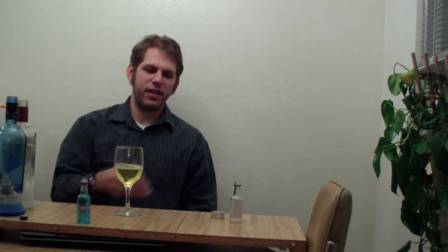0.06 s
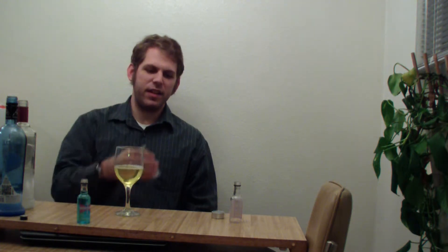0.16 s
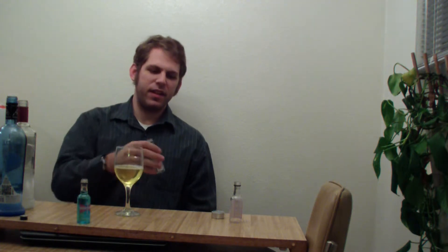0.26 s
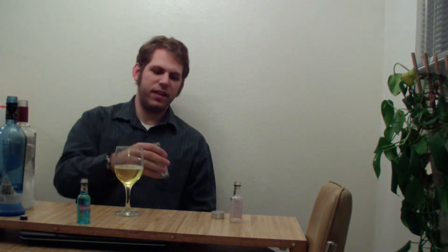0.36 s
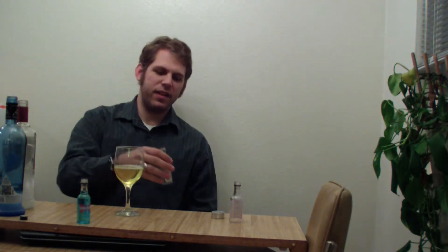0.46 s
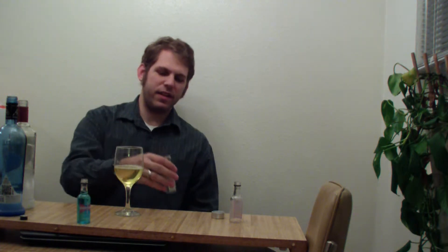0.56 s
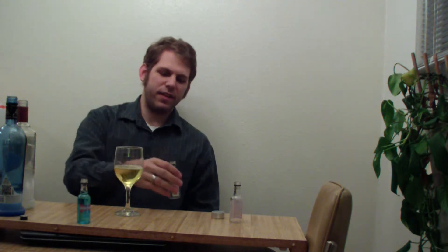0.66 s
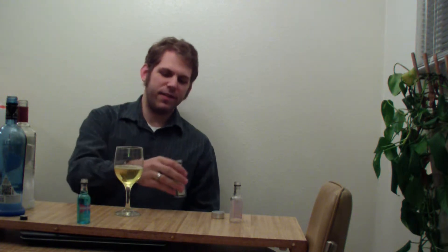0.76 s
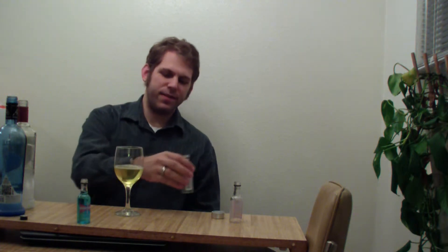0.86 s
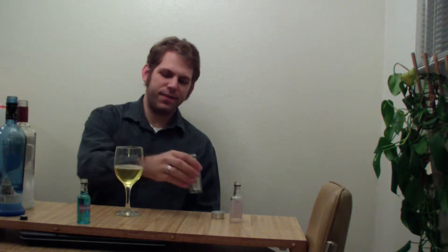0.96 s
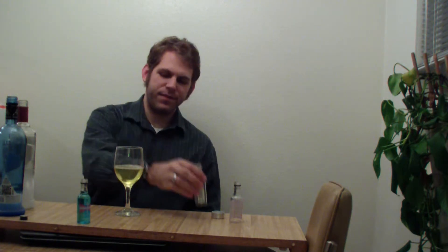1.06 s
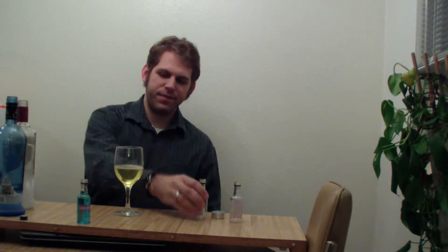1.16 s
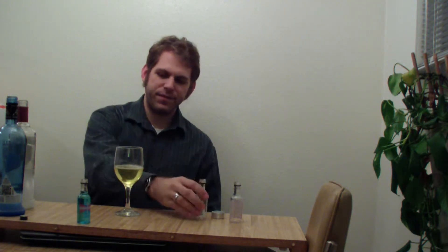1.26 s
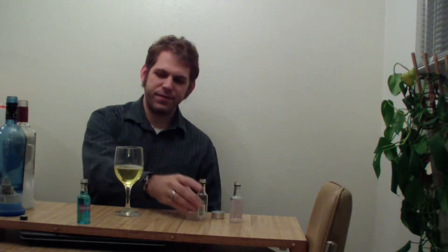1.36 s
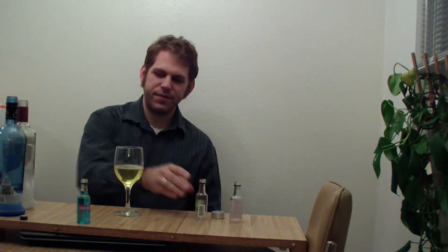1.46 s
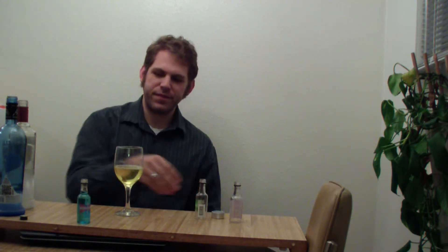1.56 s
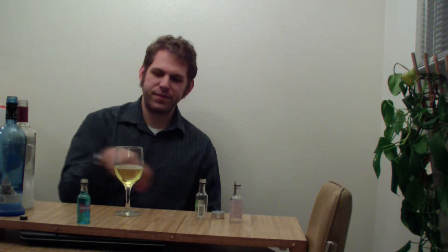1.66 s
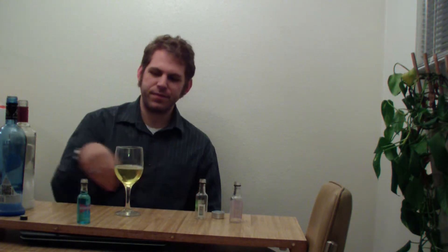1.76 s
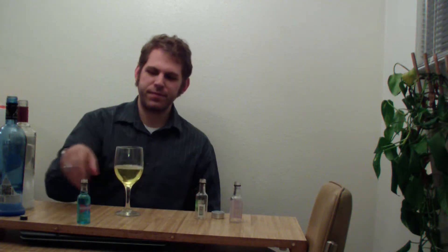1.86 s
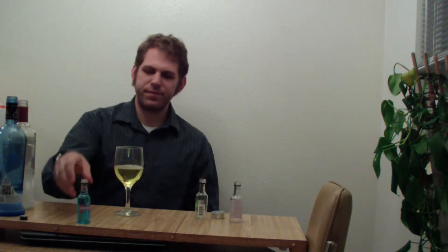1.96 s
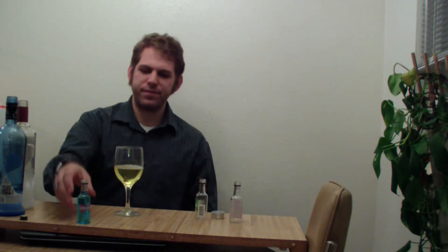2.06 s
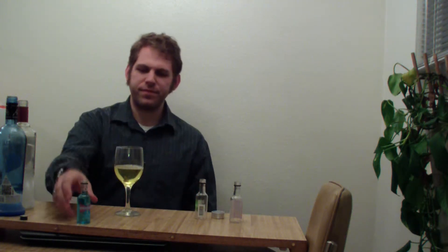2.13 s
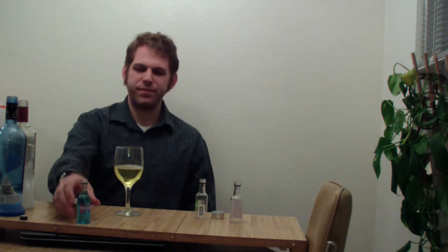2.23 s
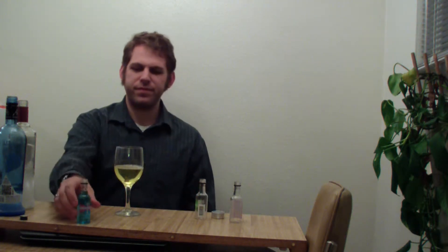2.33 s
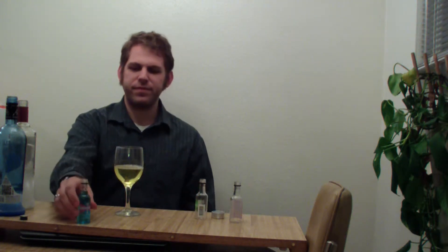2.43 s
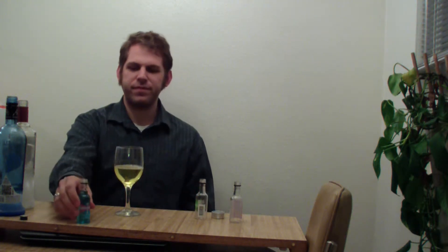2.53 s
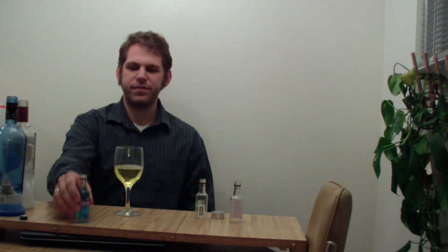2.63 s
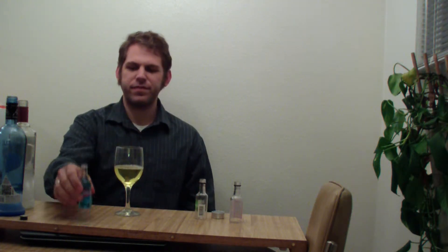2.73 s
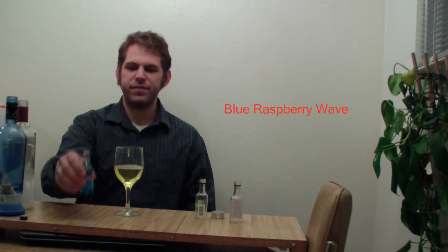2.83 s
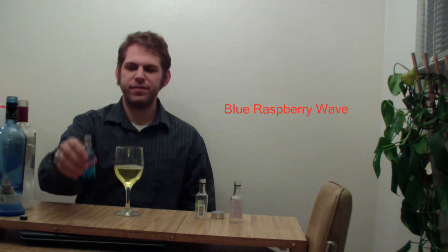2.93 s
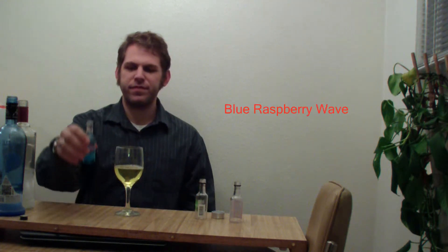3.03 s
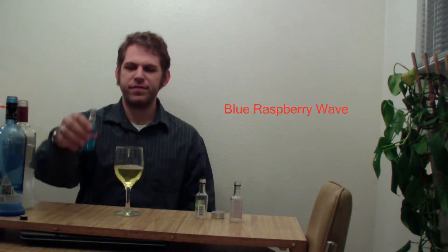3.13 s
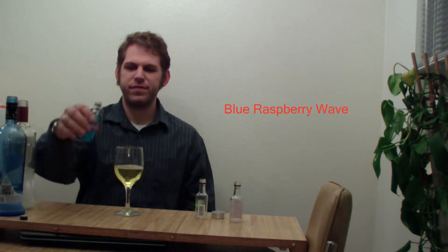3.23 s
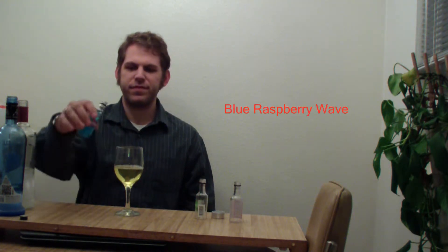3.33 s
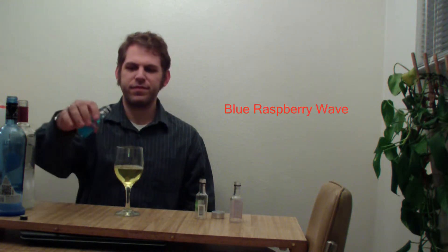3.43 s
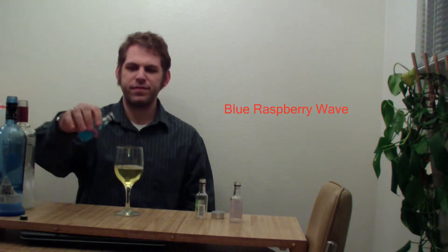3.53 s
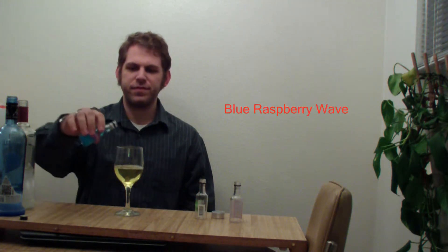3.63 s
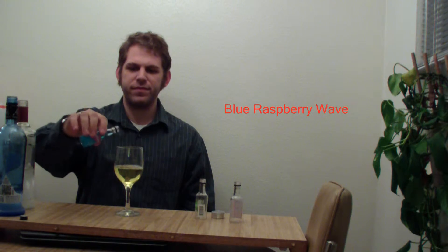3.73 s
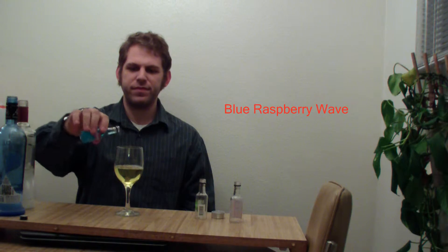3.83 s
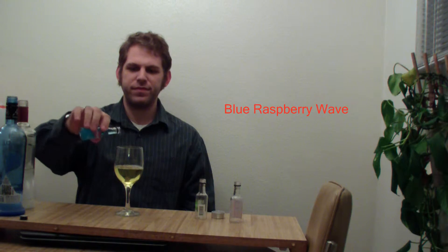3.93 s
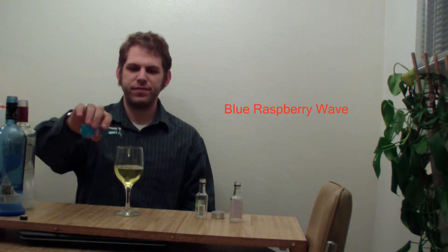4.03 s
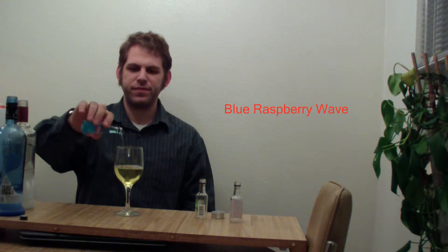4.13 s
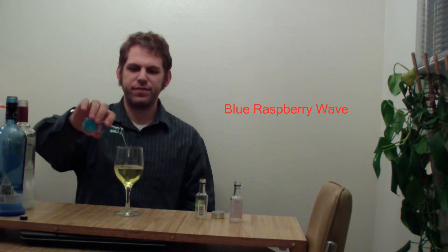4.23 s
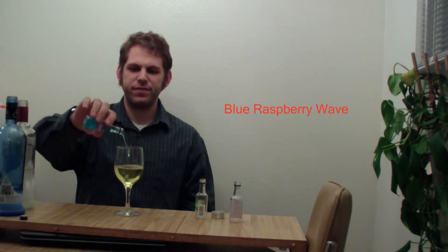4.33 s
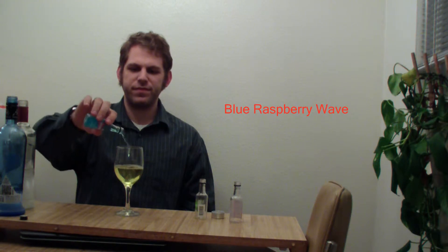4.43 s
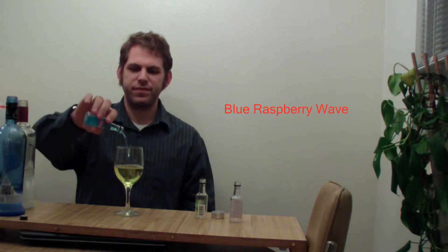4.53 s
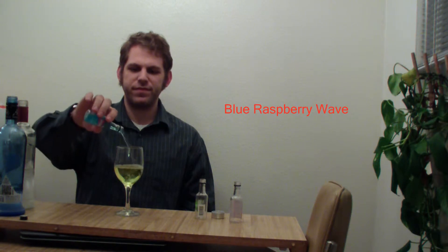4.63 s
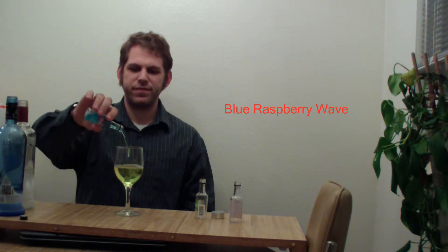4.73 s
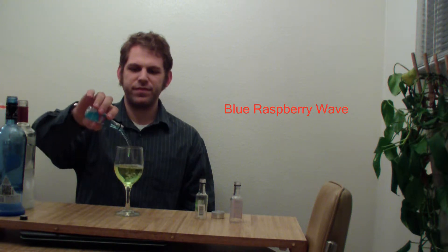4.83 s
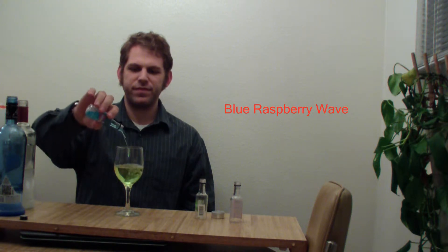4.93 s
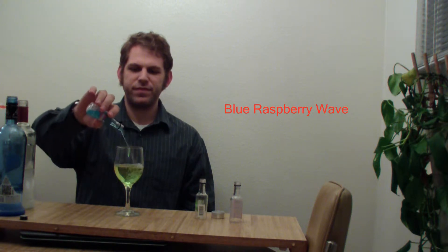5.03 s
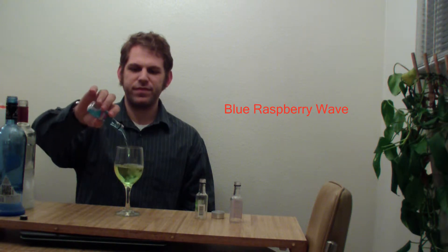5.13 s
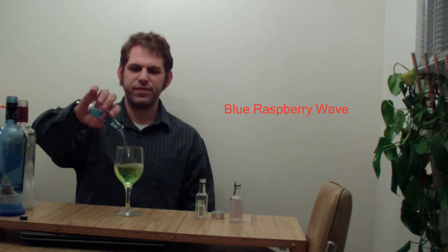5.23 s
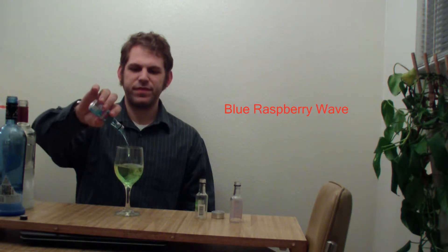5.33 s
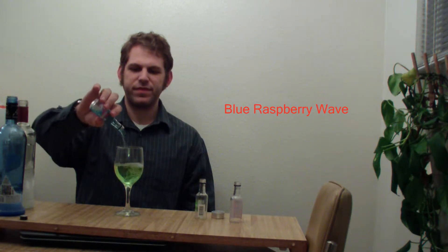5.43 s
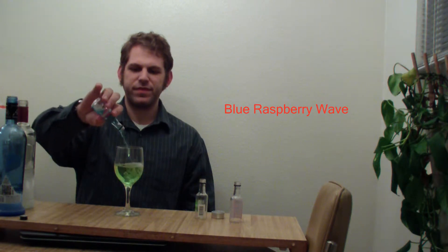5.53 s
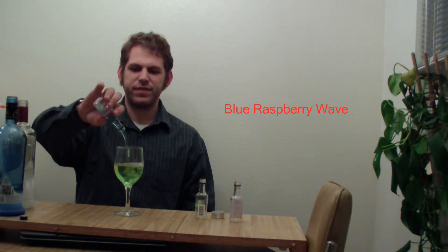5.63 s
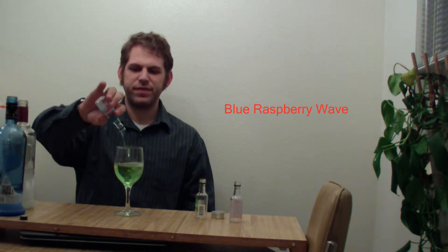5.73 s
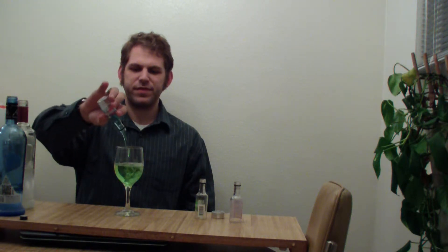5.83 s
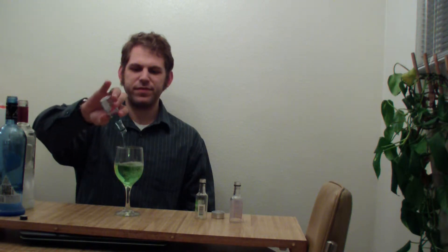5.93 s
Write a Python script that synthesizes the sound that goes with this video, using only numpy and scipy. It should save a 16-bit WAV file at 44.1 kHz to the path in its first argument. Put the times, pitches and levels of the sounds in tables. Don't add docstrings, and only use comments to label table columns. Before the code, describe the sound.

Soft hand and cloth noises come first, then an empty miniature bottle is set down abruptly on wood: one dry, bright, slightly clipped clack. Near-silence follows, only room rumble, faint hum and hiss. A few tiny drips lead into irregular hollow glugs, gurgling and splashing as liquor fills a wine glass. A plain home stereo recorder picks up short room reflections.

```python
import sys
import numpy as np
from scipy import signal
from scipy.io import wavfile

SR = 44100
rng = np.random.default_rng(int(sys.argv[2]) if len(sys.argv) > 2 else 0)


def boost(x):
    u = np.asarray(x, float) / 20
    return 10 ** u


def wrap_up_sound(samples):
    columns = np.atleast_2d(samples).T
    tamed = np.clip(columns, -1, 1)
    steps = np.round(tamed * 32767).astype(np.int16)
    wavfile.write(sys.argv[1], SR, steps)


N = 263718


# start in seconds, blow on the table in dB, blow on the bottle in dB.
KNOCKS = [
    (1.3095, 3.5, 9.5),
    (1.3169, 6, 1),
    (1.3271, 6, -4),
]
# frequency in Hz, level in dB, 60 dB decay time in s.
TABLE_MODES = [(400, -21.5, 0.035), (455, -13.5, 0.045), (560, -23, 0.052), (650.6, -6.5, 0.049),
               (755, -14, 0.18), (966, -3, 0.01), (1120, -19.5, 0.078), (1330, -17, 0.011),
               (1550, -15.5, 0.034), (1827, -5, 0.029), (2290, -24.5, 0.007)]
# frequency in Hz, level in dB, 60 dB decay time in s.
BOTTLE_MODES = [(2610, -28.5, 0.091), (2803, -5, 0.095), (2970, -18, 0.089), (3000, -13, .05),
                (3190, -17, 0.05), (3490, -12, 0.019), (4600, -18.5, 0.0096), (5583, -7.5, 0.02),
                (6210, -9, .015), (6500, -21, 0.019), (8500, -20, 0.0087), (9600, -13, 0.01),
                (11200, -32, 0.0059)]


def knock():
    out = np.zeros(N)
    t = np.arange(SR // 2) / SR
    modes = TABLE_MODES + BOTTLE_MODES
    strengths_db = rng.normal(0, 2.5, (len(modes), len(KNOCKS)))
    crack_db, crack_t60_s, crack_samples = -16.5, 0.066, 2000
    for n, (s, table_db, bottle_db) in enumerate(KNOCKS):
        blows_db = [table_db] * len(TABLE_MODES) + [bottle_db] * len(BOTTLE_MODES)
        for (hz, mode_db, t60), blow_db in zip(modes, blows_db + strengths_db[:, n]):
            impulse = boost(blow_db - 9 + mode_db) * (t == 0)
            add(out, s, ring(impulse, hz, t60))
        rattle = filtered(rng.standard_normal(crack_samples), 1, [1500, 7500], "band")
        decay = boost(-60 * t[:crack_samples] / crack_t60_s)
        add(out, s, boost(bottle_db + crack_db) * rattle * decay)
    out = filtered(out, 10, 380, "high")
    add(out, KNOCKS[0][0], thud(t))
    return out


def thud(t):
    thud_hz, thud_db, thud_t60_s = 130.7, -30.5, 0.2
    rumble = filtered(rng.standard_normal(len(t)), 2, thud_hz * np.array([0.4, 2.2]), "band")
    return boost(thud_db - 60 * t / thud_t60_s) * rms_one(rumble)


def pour():
    pockets = glugs() + plinks()
    splash = spray()
    return pockets + gurgle() + splash + wine_glass(pockets + splash)


# start in seconds, peak in dB, pitch in Hz.
GLUGS = [(4.375, -20, 934), (4.38, -27, 459), (4.648, -34, 1060), (4.733, -29.5, 930), (4.733, -31.5, 472),
         (4.904, -26, 1250), (4.907, -24, 926), (4.928, -27, 442), (4.944, -18.5, 1110), (4.95, -27, 750),
         (5.065, -30.5, 780), (5.142, -21.5, 1227), (5.146, -27, 680), (5.358, -25, 910),
         (5.361, -22.5, 487), (5.37, -22.5, 693), (5.466, -30, 1240), (5.538, -18.5, 498),
         (5.538, -21, 560), (5.537, -27, 903), (5.609, -30.5, 415), (5.669, -24, 1100),
         (5.721, -26.5, 1096), (5.781, -19, 1250), (5.785, -24.5, 560), (5.796, -29, 1120),
         (5.818, -21.5, 932), (5.828, -27.5, 460), (5.962, -26.5, 1120), (5.966, -30, 560),
         (4.427, -33, 866), (4.606, -41, 1200), (4.697, -35, 824), (4.775, -26, 1720),
               (4.775, -40, 458), (4.815, -34.5, 867), (4.997, -29, 1050), (5.193, -40, 455),
               (5.297, -37, 496), (5.627, -35, 1240), (5.688, -26, 1580), (5.738, -29, 690)]


def glugs():
    out = np.zeros(N)
    for s, db, hz in GLUGS:
        add(out, s, boost(db - 7) * bubble(hz, cycles=27, rise=0.083, attack_s=0.00073))
    return out


# start in seconds, peak in dB, pitch in Hz.
PLINKS = [(3.93, -35, 3180), (4.139, -37, 3740), (4.3063, -29.5, 4060), (4.4542, -32.5, 7080),
          (4.647, -38.5, 3900), (4.693, -38, 7050), (4.724, -36, 4770), (4.769, -28.5, 6530),
          (4.907, -36, 5600), (4.931, -34.5, 4770), (4.976, -31.5, 8500), (5.11, -33.5, 4620),
          (4.875, -31, 11200), (5.288, -30, 4600), (5.286, -29.5, 7210), (5.3563, -28, 6800),
          (5.3568, -19, 9340), (5.466, -42, 4580), (5.582, -36, 3010), (5.617, -35, 6350),
          (5.634, -34, 4600), (5.654, -26, 11200), (5.726, -30, 7210), (5.761, -28.5, 5100),
          (5.763, -26, 11000), (5.821, -36, 5970), (5.851, -37.5, 9350), (5.853, -43, 2770),
          (5.892, -37, 4950), (5.929, -41, 7940)]


def plinks():
    out = np.zeros(N)
    for s, db, hz in PLINKS:
        add(out, s, boost(db + 1) * bubble(hz, cycles=52, rise=0.05, attack_s=0.000097))
    return out


def bubble(hz, cycles, rise, attack_s):
    t60 = max(cycles, 2) / hz
    t = np.arange(int(t60 * SR)) / SR
    tone = np.sin(2 * np.pi * hz * (t + rise * t ** 2 / t60))
    return tone * boost(-60 * t / t60) * (1 - np.exp(-t / attack_s))


def gurgle():
    clicks = grains(per_s=260, spread_db=3)
    dealt = rng.integers(0, 40, N)
    bed = 0
    for k, hz in enumerate(np.geomspace(420, 1330, 40)):
        bed = bed + soft_ring(clicks * (dealt == k), hz, cycles=27)
    return boost(-7) * surge(column=1, t60=0.7) * rms_one(bed)


# frequency in Hz, level in dB per Hz.
FIZZ_COLOUR = [(880, -30), (1500, 4), (2150, -3), (2910, 3.5), (3430, 3), (5110, -0.5), (7620, -3),
               (9080, -3.5), (15400, -10.5)]


def spray():
    clicks = grains(per_s=2600, spread_db=3)
    dealt = rng.integers(0, 40, N)
    fizz = 0
    for k, hz in enumerate(np.geomspace(1700, 15000, 40)):
        rung = soft_ring(clicks * (dealt == k), hz, cycles=24)
        fizz = fizz + boost(at_hz(FIZZ_COLOUR, hz)) * hz * rung
    slap = filtered(rng.standard_normal(N), 1, [2500, 11000], "band")
    fizz_bed = boost(-2.5) * surge(column=2, t60=0.41) * rms_one(fizz)
    return fizz_bed + boost(0.5) * surge(column=2, t60=0.03) * slap


# start in seconds, gurgle level in dB, fizz level in dB.
SLUGS = [(4.302, -57, -56), (4.376, -46, -50), (4.45, -55, -55), (4.645, -49, -52.5), (4.722, -47, -44.5),
         (4.904, -41, -41.5), (5.06, -42.5, -47.5), (5.106, -54, -45), (5.14, -41, -44), (5.27, -49.5, -41),
         (5.356, -36, -41), (5.45, -63, -44), (5.538, -38.5, -49.5), (5.62, -44, -39.5),
         (5.72, -39.5, -39.5), (5.79, -39.5, -45), (5.85, -62, -43.5), (5.96, -34.5, -55)]


def surge(column, t60):
    power = np.zeros(N)
    t = np.arange(SR) / SR
    landing = 1 - np.exp(-t / 0.0013)
    for row in SLUGS:
        gain = boost(row[column] - 60 * t / t60) * landing
        add(power, row[0], gain ** 2)
    return np.sqrt(power)


# frequency in Hz, level in dB, 60 dB decay time in s.
GLASS_MODES = [(3020, -21.5, 0.11), (5800, -28, 0.1), (7210, -29, 0.081)]


def wine_glass(liquid):
    wall = filtered(liquid, 2, 2000, "high")
    return sum(boost(db - 18) * ring(wall, hz, t60) for hz, db, t60 in GLASS_MODES)


# start in seconds, peak in dB, centre in Hz, width in Hz,
# 60 dB decay time in s.
TOUCHES = [
    (.138, -33, 1020, 900, 0.019),
    (0.181, -47, 400, 300, 0.12),
    (.272, -44, 4300, 1580, 0.024),
    (.45, -45, 755, 200, 0.017),
    (.626, -32, 890, 614, 0.022),
    (0.654, -41, 450, 400, 0.036),
    (.815, -39.5, 1500, 1800, 0.033),
    (0.861, -48, 840, 200, 0.074),
    (1.193, -33.5, 780, 300, .018),
    (2.811, -46, 1100, 1200, 0.14),
]


def touches():
    out = np.zeros(N)
    t = np.arange(SR // 6) / SR
    for s, db, hz, width_hz, t60 in TOUCHES:
        noise = rng.standard_normal(len(t))
        body = rms_one(ring(noise, hz, 2.2 / width_hz))
        scuff = rms_one(filtered(noise, 2, [900, 3800], "band"))
        puff = body + boost(-4.5) * scuff
        add(out, s, boost(db - 3) * puff * boost(-60 * t / t60))
    return out


# frequency in Hz, level in dB, 60 dB decay time in s.
ROOM_MODES = [(408.7, -41.5, 0.31), (450, -32.5, 0.18), (562.4, -39, 0.19), (670.6, -55, 0.39),
              (693.4, -26, 0.094), (751, -35.5, 0.13), (872, -29.5, 0.1), (926, -28, 0.097),
              (937, -35.5, 0.24), (1120, -24, 0.1), (1250, -29, 0.088), (1414, -26, 0.1),
              (1578, -44.5, 0.61), (1821, -56, 0.2)]
# frequency in Hz, 60 dB decay time in s.
ROOM_T60 = [(200, 0.58), (1000, 0.37), (4000, 0.42), (8000, 0.27), (14000, 0.24)]
# frequency in Hz, level in dB.
ROOM_TAIL = [(200, -40), (700, -40), (1300, -27.5), (2200, -39), (4000, -36), (9000, -32.5), (15000, -36)]
# frequency in Hz, left-right likeness from 0 to 1.
TAIL_LIKENESS = [(300, 0.98), (1500, 0.91), (3500, 0.93), (7000, 0.11), (14000, 0.051)]


def room(x):
    t = np.arange(SR // 2) / SR
    echo = 0
    for hz, band in bands(len(t), TAIL_LIKENESS, low_hz=150):
        echo = echo + boost(at_hz(ROOM_TAIL, hz) - 60 * t / at_hz(ROOM_T60, hz)) * band
    for k, (hz, db, t60) in enumerate(ROOM_MODES):
        lean_db = rng.normal(0, 0.73) * np.array([[1], [-1]])
        wave = ring(boost(db - 12) * (t == 0), hz, t60)
        echo = echo + (-1) ** k * boost(lean_db) * wave
    swell = 1 - np.exp(-t / 0.0013)
    direct = x * boost([[-0.3], [0.3]])
    return direct + signal.fftconvolve(x[None], echo * swell)[:, :N]


# frequency in Hz, level in dB.
FLOOR_COLOUR = [(12, -32), (20, -1.5), (32, -7), (66, -2.5), (90, -10.5), (122, -3), (231, -9.5),
                (251, -14), (360, -10.5), (450, -16.5), (489, -15.5), (683, -19), (1910, -24), (3820, -21),
                (15400, -30)]
# frequency in Hz, left-right likeness from 0 to 1.
FLOOR_LIKENESS = [(60, 0.8), (180, 0.86), (540, 0.66), (1640, 0.455), (4950, 0.14), (14900, 0.01)]
# frequency in Hz, level in dB rms.
HUM = [(60, -72), (120, -69.5)]
# time in seconds, level in dB.
RUSTLE = [(0, -51.5), (.25, -68.5), (.6, -91), (.9, -65), (1.2, -56.5), (1.3, -59.5), (1.4, -60),
          (5.98, -95)]
# frequency in Hz, level in dB per Hz.
RUSTLE_COLOUR = [(200, -11), (500, -7), (1200, -2.5), (3000, 4), (6000, -30), (12000, -33.5)]


def background():
    t = np.arange(N) / SR
    floor = cloth = 0
    for hz, band in bands(N, FLOOR_LIKENESS, low_hz=18.57):
        floor = floor + boost(at_hz(FLOOR_COLOUR, hz)) * band
        cloth = cloth + boost(at_hz(RUSTLE_COLOUR, hz)) * band[:, ::-1] * (hz > 150)
    hum = sum(np.sqrt(2) * boost(db) * np.sin(2 * np.pi * hz * t) for hz, db in HUM)
    rustle_s, rustle_db = np.transpose(RUSTLE)
    arm = boost(np.interp(t, rustle_s, rustle_db))
    return boost(-47) * rms_one(floor) + arm * rms_one(cloth) + hum


def rms_one(x):
    return x / np.sqrt(np.mean(x ** 2) + 1e-20)


def filtered(x, order, hz, kind):
    return signal.sosfilt(signal.butter(order, hz, kind, fs=SR, output="sos"), x)


def at_hz(points, hz):
    table_hz, values = np.transpose(points)
    return np.interp(np.log(hz), np.log(table_hz), values)


def add(out, s, sound):
    i = round(s * SR)
    out[i:i + len(sound)] += sound[:N - i]


def ring(clicks, hz, t60):
    r = boost(-60 / (t60 * SR))
    w = 2 * np.pi * hz / SR
    return signal.lfilter([0, np.sin(w)], [1, -2 * r * np.cos(w), r * r], clicks + 1e-18)


def soft_ring(clicks, hz, cycles):
    return hz / SR * ring(ring(clicks, hz, 8 / hz), hz, cycles / hz)


def grains(per_s, spread_db):
    sizes = boost(spread_db * np.minimum(rng.exponential(1, N), 4)) * rng.choice([-1, 1], N)
    return sizes * (rng.random(N) < per_s / SR)


def bands(size, likeness, low_hz):
    white = rng.standard_normal((2, 2, size))
    edges = low_hz * 2 ** np.arange(0, np.log2(16500 / low_hz), 1 / 3)
    for k, (low, high) in enumerate(zip(edges, edges[1:])):
        mid, side = filtered(white[k % 2], 2, [low, high], "band")
        hz = np.sqrt(low * high)
        alike = np.clip(at_hz(likeness, hz), -1, 1)
        yield hz, np.sqrt(1 + alike) * mid + np.sqrt(1 - alike) * side * [[1], [-1]]


def scene():
    return room(knock() + pour() + touches()) + background()


def roll_off(x):
    return signal.sosfilt(signal.butter(12, 15500, fs=SR, output="sos"), x)


def record(dry):
    clipped = np.clip(dry, -0.97, 0.97)
    top_cut = signal.cheby2(12, 60, 16400, fs=SR, output="sos")
    mix = signal.sosfilt(top_cut, clipped)
    return roll_off(mix)


dry = scene()
out = record(dry)
wrap_up_sound(out)
```